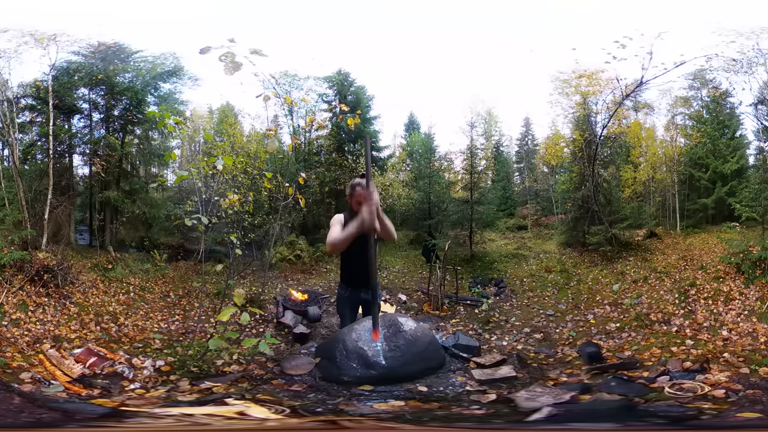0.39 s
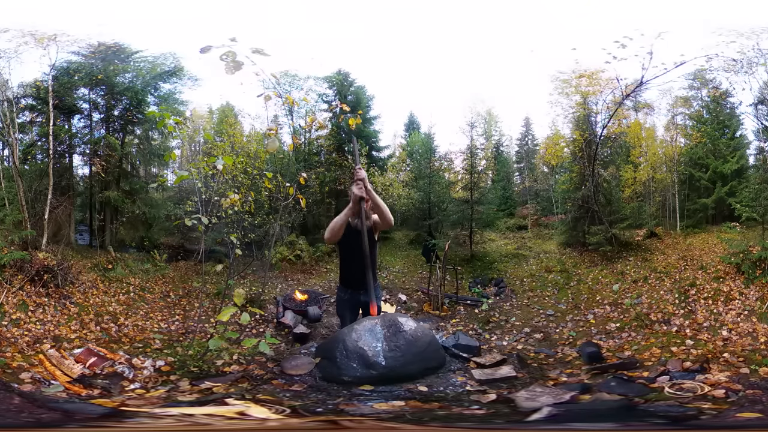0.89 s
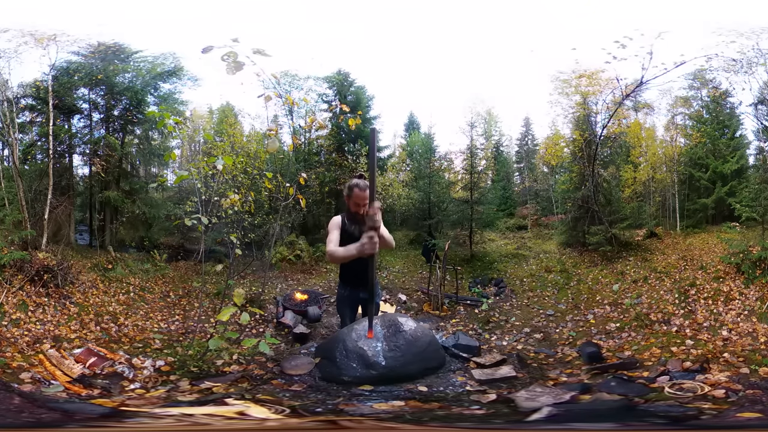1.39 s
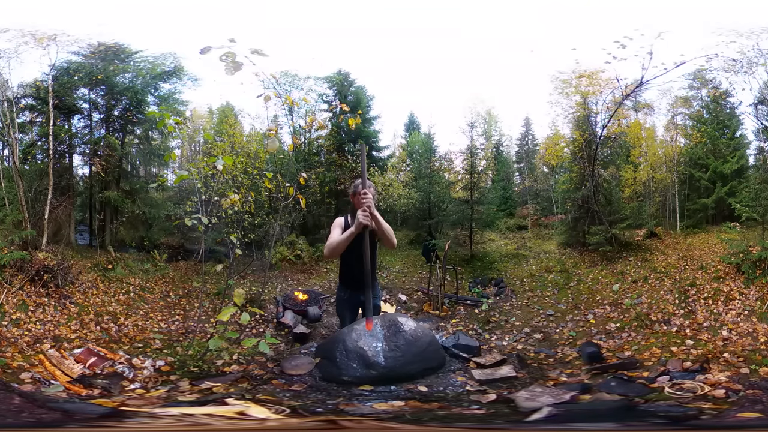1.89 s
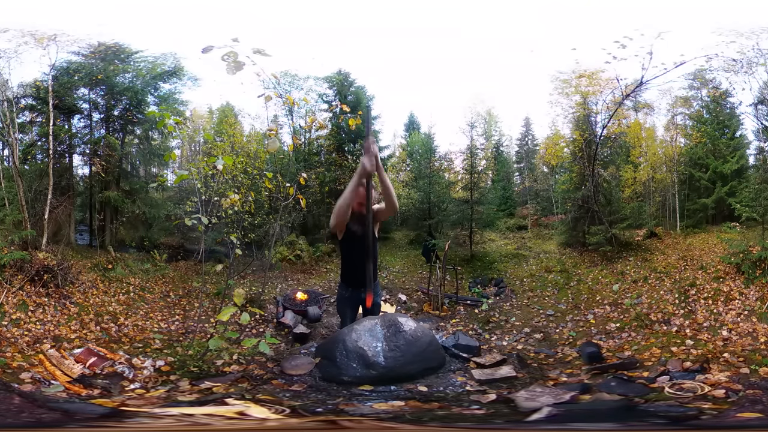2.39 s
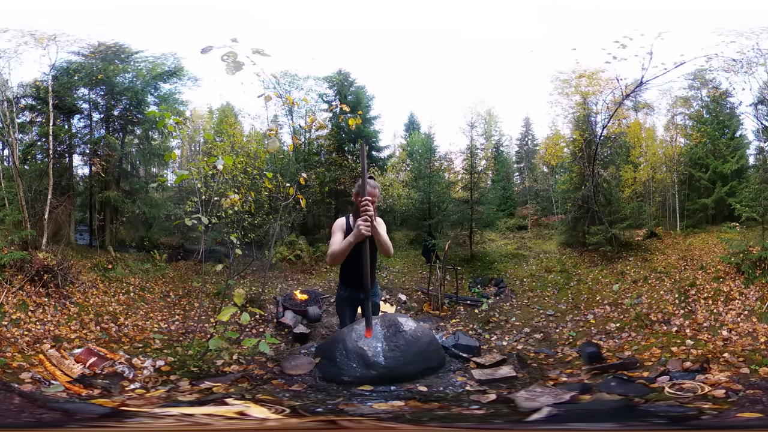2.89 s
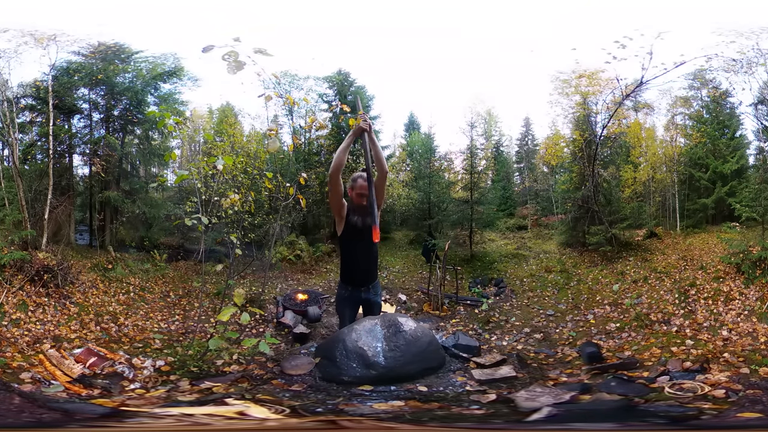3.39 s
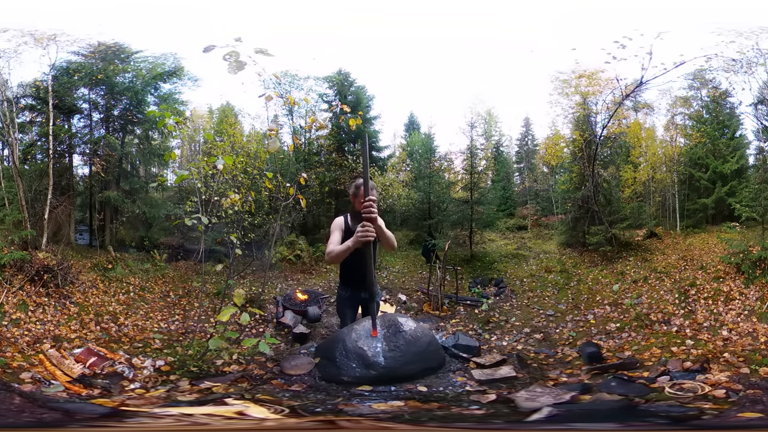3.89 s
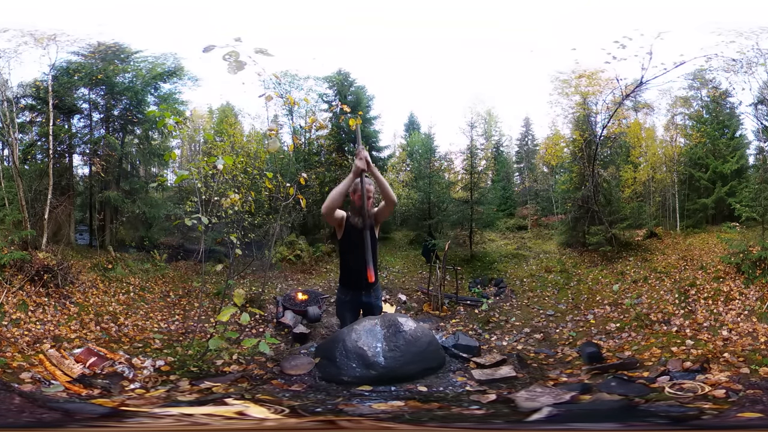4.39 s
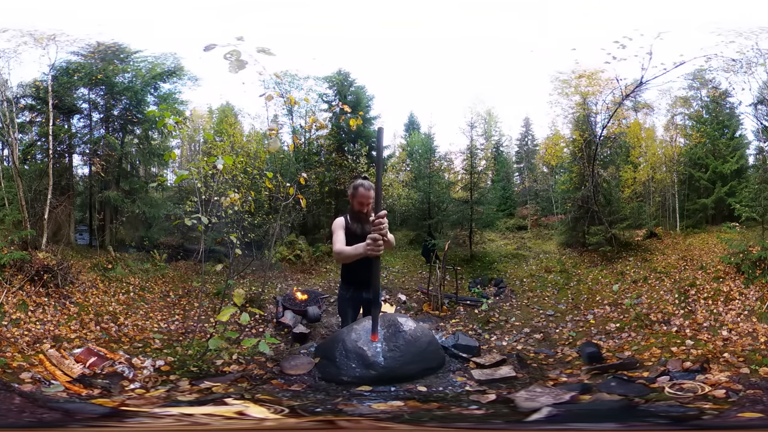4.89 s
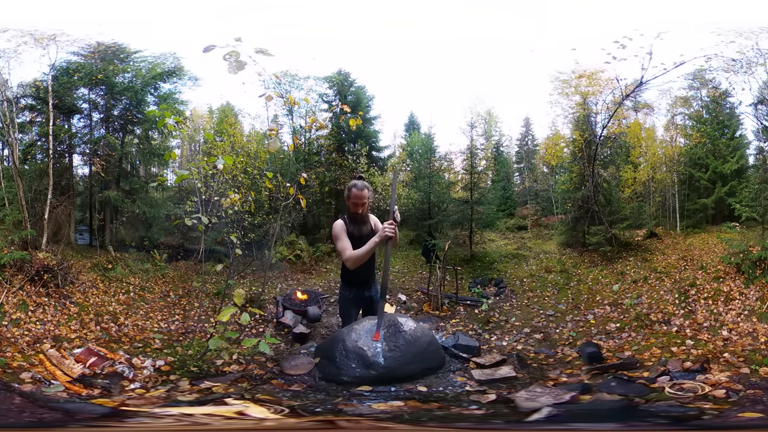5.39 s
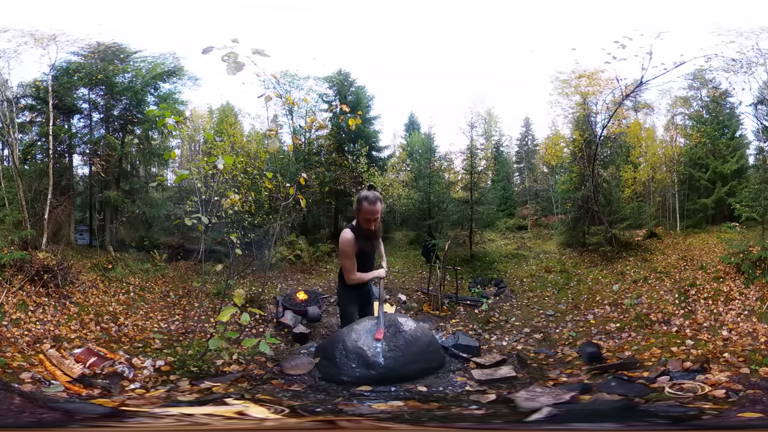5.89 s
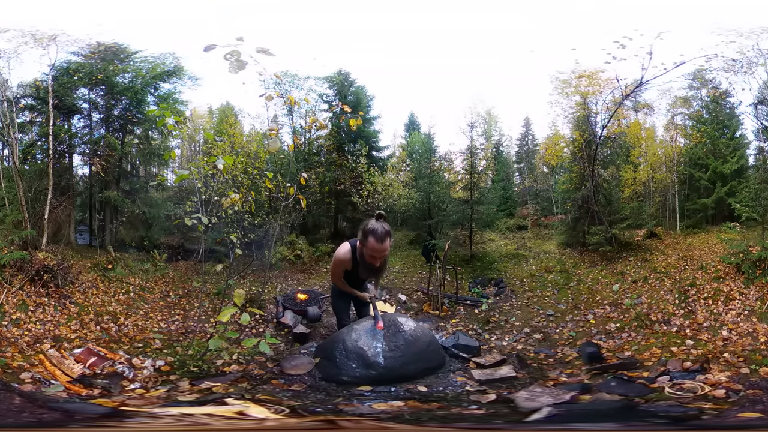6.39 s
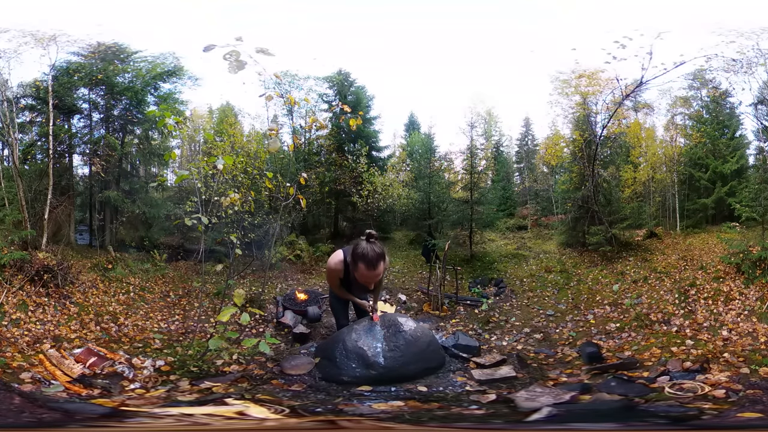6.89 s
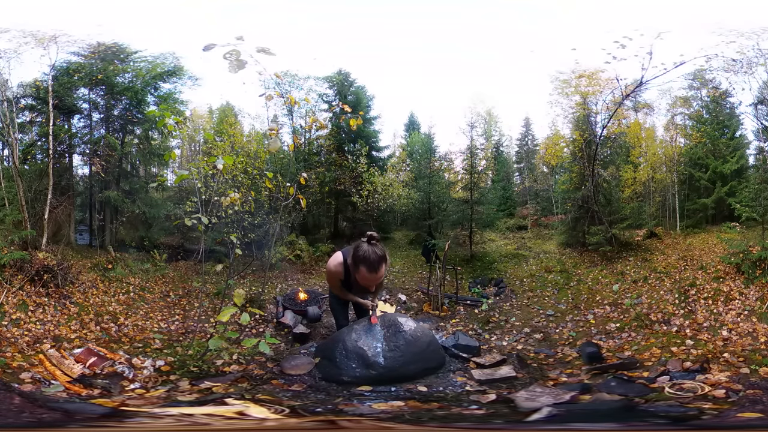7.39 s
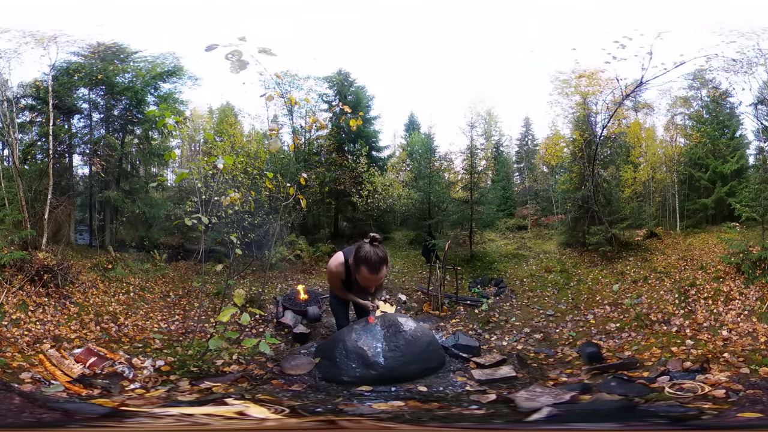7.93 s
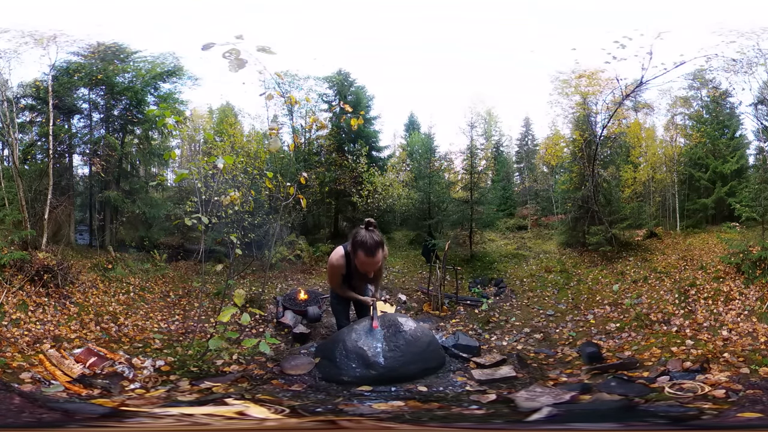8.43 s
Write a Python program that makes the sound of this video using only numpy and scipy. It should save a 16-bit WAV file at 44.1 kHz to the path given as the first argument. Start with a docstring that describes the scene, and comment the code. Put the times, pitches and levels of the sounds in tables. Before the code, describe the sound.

A mono outdoor take in a calm forest clearing, with faint steady wind in distant leaves. It opens with a thin residual metallic ring from the raised bar, a soft hand slide and a tiny high bird note. At about 0.45 seconds a steel bar lands end-first on a boulder: a loud, sharp crack, quick rebounds, a bright ring and a gritty spray of scale. Similar blows follow near 1.4, 2.5, 3.65 and 4.85 seconds, the later ones chattering longer and jangling in changing pitches before the hands choke them. Each has a soft low ground thump and a short diffuse answer from the trees. Grainy hisses of palms sliding on steel and small ticks fill the gaps. Brief bird notes appear around 4.6 to 4.85. A last faint slide ends near 5.4, tiny low knocks come at 6, then only quiet leaf rustle until about 8.6.

```python
"""A flat steel bar, its end hot, is lifted with both hands and dropped end-first on a boulder in a forest clearing.
Each blow cracks as a falling chirp; the tip rebounds and chatters, and the bar rings in bending and lengthwise modes.
Hot scale sprays as gritty noise, the ground booms softly and the trunks answer with decaying noise.
Behind it: shaped noise for wind in far leaves and for hands sliding on steel, a small bird in wavering sines,
and ticks as short damped rings. One microphone, mono."""
import sys
import numpy as np
from scipy import signal
from scipy.fft import rfft, irfft, next_fast_len
from scipy.io import wavfile
from scipy.ndimage import uniform_filter1d, map_coordinates

SR = 44100
rng = np.random.default_rng(int(sys.argv[2]) if len(sys.argv) > 2 else 0)


def elevation(decibels):
    """Turn decibel levels (scalar or array-like) into linear amplitude ratios."""
    levels = np.asarray(decibels, float)
    return 10 ** (levels / 20)


def unload_wav(signal):
    """Save mono or channel-first audio to the path in sys.argv[1] as 16-bit WAV at rate SR, clipped to [-1, 1]."""
    wavfile.write(
        sys.argv[1],
        SR,
        np.round(np.clip(np.atleast_2d(signal).T, -1, 1) * 32767).astype(np.int16),
    )


N = 376613  # length in samples

# bending modes of the bar, a pair for its two planes:
# flatwise f/Hz, edgewise f/Hz, relative level in a blow/dB, relative level in a rebound/dB
BAR_MODES = [(650.4, 681, -5, -18.5), (1050, 1104, -7, -11), (1536, 1650, -4.5, -3.5),
             (2121, 2262, -2, 0.5), (2760, 2972, -3, -7.5), (3550, 3766, -5.5, -2.5),
             (4445, 4609, -15, -7.5), (5235, 5543, -10.5, -7.5), (6160, 6535, -20, -16),
             (7280, 7590, -14, -17), (8240, 8680, -24, -27)]
# contacts of tip and stone, each blow then its chatter:
# t/s, crack peak level/dB, bending level/dB, favoured mode f/Hz, lengthwise level/dB
CONTACTS = [ (.4510, -4.5, -34, 2760, -29.5), (.483, -26, -34.5, 2970, -33),
            (.503, -31, -42.5, 1650, -36.5), (1.4184, -5, -30, 1650, -32), (1.4431, -26, -34.5, 2970, -55),
            (1.456, -41, -42.5, 5545, -61), (1.485, -33, -45, 1650, -37.5), (2.497, -4.5, -29.5, 2118, -36),
            (2.5298, -19, -32.5, 3550, -46), (2.562, -57, -39.5, 3550, -28), (2.585, -46, -40, 5235, -28.5),
            (2.598, -39, -42.5, 2970, -32), (3.6600, -4.5, -29.5, 1650, -51), (3.686, -45, -35, 1105, -48),
            (3.6981, -19, -32.5, 3765, -40), (3.707, -32, -31.5, 3765, -44), (3.72, -40, -36, 5545, -32),
            (3.756, -38, -39, 5235, -57), (3.782, -48, -49, 1650, -40), (4.8629, -3.5, -31, 2265, -42),
            (4.9, -21, -32.5, 2265, -44), (4.913, -26, -31.5, 2970, -37), (4.941, -54, -38, 5545, -40),
            (4.953, -39, -35.5, 2970, -52), (4.969, -48, -39, 3766, -37), (5.005, -38, -46, 2265, -39)]
# each blow in turn: hands close t/s, lengthwise fade until then/(dB/s), crack brightness/(dB per octave),
# level of the plane not struck/dB, scale spray level/dB
GRIPS = [(.57, 41, 3, -2, -19), (1.741, 95, 6.5, -7, -37), (2.76, 126, 4.5, -14, -55),
         (4.04, 51, 4.5, -15, -57), (5.19, 120, 10, 0, -47)]
BLOW_DB = -15  # a contact whose crack is stronger is a blow


def unit(x):
    """Scaled to rms 1."""
    return x / np.sqrt(np.mean(x ** 2) + 1e-20)


def along(f, v, hz):
    """Points joined on a log frequency axis."""
    return np.interp(np.log(hz + 1), np.log(np.asarray(f) + 1), v)


def curve(rows):
    """One value per sample for each column after the time."""
    s, *cols = np.transpose(rows)
    return [np.interp(np.arange(N) / SR, s, c) for c in cols]


def wobble(rate):
    """A smooth random curve, rate knots a second."""
    knots = rng.standard_normal(int(N * rate / SR) + 4)
    return map_coordinates(knots, [np.arange(N) * rate / SR])


def coloured(x, spectrum):
    """x with the (f/Hz, level/dB) spectrum laid on it."""
    m = next_fast_len(N + 8192)
    gain = elevation(along(*np.transpose(spectrum), np.fft.rfftfreq(m, 1 / SR)))
    return irfft(rfft(x, m) * gain, m)[:N]


def rush(spectrum, patchy_db):
    """Coloured noise of rms 1 with patches of random gain."""
    z = signal.stft(rng.standard_normal(N), nperseg=512)[2]
    field = uniform_filter1d(rng.standard_normal(z.shape), 6, 0)  # smooth across frequency
    field = uniform_filter1d(field, 10, 1)  # and time
    patchy = signal.istft(z * elevation(patchy_db * unit(field)), nperseg=512)[1]
    return unit(coloured(patchy, spectrum))


def tone(rows, hz, db, waver_hz):
    """A slightly unsteady sine that lasts as long as its table."""
    t = np.arange(N) / SR
    fade = np.clip(np.minimum(t - rows[0][0] + 0.0056, rows[-1][0] - t) / 0.0046, 0, 1)
    phase = 2 * np.pi * np.cumsum(hz + waver_hz * wobble(120)) / SR
    return np.sqrt(2) * fade * elevation(db) * np.sin(phase)


def emphasis(hz, loud_hz, loud_db, octaves):
    """Where and how the tip lands favours some modes: a bump in dB around loud_hz."""
    return loud_db * np.exp(-(np.log2(hz / loud_hz) / octaves) ** 2)


def wind():
    """Leaves far off: steady coloured noise with slow and quick swells."""
    # colour of the leaves: f/Hz, relative level/dB per Hz
    leaf_colour = [(35, -65), (60, -27.5), (121, -29.5), (266, -15.5), (404, -6.5), (615, -4), (913, -1),
                   (2850, -4.5), (10800, -19.5), (15600, -17)]
    level_db = -55 + 0.18 * wobble(2.18) + 0.38 * wobble(15)
    return elevation(level_db) * rush(leaf_colour, patchy_db=1.02)


def bird():
    """Thin high notes with a fast tremble in level and a waver in pitch."""
    # one list per note: t/s, f/Hz, level before the tremble/dB
    notes = [
        [(0.001, 8350, -69), (0.048, 7700, -61), (0.14, 8330, -62.5), (0.21, 8250, -72)],
        [(4.59, 7600, -74), (4.62, 7900, -68), (4.67, 8360, -76)],
        [(4.725, 7600, -66), (4.818, 8050, -60), (4.855, 7840, -75)],
    ]
    tremble = elevation(3.1 * wobble(200))
    return tremble * sum(tone(rows, *curve(rows), waver_hz=160) for rows in notes)


def ticks():
    """Short damped rings, their pitch scattered from cycle to cycle."""
    # small ticks and knocks: t/s, level before the bass cut/dB, f/Hz, t60/s
    small_knocks = [(.786, -51, 1380, 0.035), (1.129, -42, 2050, 0.026), (1.474, -43, 15550, .05),
                    (1.644, -45, 15550, .06), (1.809, -46, 10900, 0.006), (2.606, -49, 15550, .05),
                    (2.835, -49, 7000, 0.0035), (3.648, -46, 914, 0.058), (5.992, -54.5, 395, 0.092),
                    (5.991, -61, 672, 0.17), (6.085, -60, 581, 0.29)]
    out, t = np.zeros(N + SR), np.arange(SR // 8) / SR
    for s, db, hz, t60 in small_knocks:
        scatter = unit(uniform_filter1d(rng.standard_normal(len(t)), round(SR / hz)))
        scatter_hz = np.clip(0.081 * hz, 130, 400)
        ring = np.sin(2 * np.pi * np.cumsum(hz + scatter_hz * scatter) / SR)
        attack = 1 - np.exp(-t / 0.00012)
        out[round(s * SR):][:len(t)] += elevation(db - 60 * t / t60) * attack * ring
    return coloured(out, [(60, -6), (250, 6.5)])  # too small to push out bass


def hands():
    """Hands along the bar: a bright, slightly grainy hiss that swells along each slide and stops short."""
    # slides: start t/s, end t/s, level at the top of the swell/dB
    slides = [(-.05, 0.126, -55), (0.5, 0.754, -49.5), (1.475, 1.708, -55), (1.97, 2.228, -52.5),
              (3.117, 3.384, -51), (3.79, 3.976, -52), (4.365, 4.554, -52), (5.053, 5.39, -59)]
    # colour of skin on steel: f/Hz, relative level/dB per Hz
    skin_colour = [(60, -57), (300, -15), (1200, 3.5), (4000, 1), (9000, -6.5), (15500, -0.5)]
    t, stroke = np.arange(N) / SR, np.zeros(N)
    for start, end, db in slides:
        rise = (t - start) / (.5 * (end - start))
        stop = (end - t) / 0.024
        stroke += elevation(db) * np.clip(np.minimum(rise, stop), 0, 1)
    grain = elevation(1.5 * wobble(40) + 0.58 * wobble(230))
    return stroke * unit(grain * rush(skin_colour, patchy_db=-3.5))


def ground():
    """The boulder rocks in the soil: a low boom swells a moment after each blow."""
    t = np.arange(N) / SR
    swell = sum(elevation(db) * np.exp(-((t - s - .1) / 0.029) ** 2) for s, db, *_ in CONTACTS if db > BLOW_DB)
    boom = rush([(35, -36), (62, 1.0), (100, -24), (500, -52)], patchy_db=3)
    return elevation(-70.5) * swell * boom


def scale():
    """Each blow sheds brittle scale: a bright gritty spray of noise that soon dies."""
    # colour of the spray: f/Hz, relative level/dB per Hz
    spray_colour = [(3000, -37), (7000, -12), (12000, -9), (15500, 7)]
    spray_t60 = .13  # s
    t = np.arange(N) / SR
    blows = [s for s, db, *_ in CONTACTS if db > BLOW_DB]
    spray = sum((t > s) * elevation(row[4] - 60 * np.abs(t - s) / spray_t60) for s, row in zip(blows, GRIPS))
    return spray * unit(elevation(6.8 * wobble(400)) * rush(spray_colour, patchy_db=-5.0))


def clearing(x):
    """The trunks answer with noise, each frequency dying at its own speed; new noise every 9/8 s."""
    # the trunks: f/Hz, relative level/dB, t60/s
    trunks = [(60, -15, 0.72), (152, 7.5, 0.11), (497, -24, 1), (2000, -19, 0.7), (5970, -19, 1),
              (15000, -9, 0.24)]
    out, (f, db, t60) = np.zeros(N + 2 * SR), np.transpose(trunks)
    span = 9 * SR // 8
    for start in range(SR // 5, N, span):
        hz, t, z = signal.stft(rng.standard_normal(SR // 2), SR, nperseg=512)
        decay_db = along(f, db, hz)[:, None] - 60 * t / along(f, t60, hz)[:, None]
        build = 1 - np.exp(-t / 0.019)
        tail = signal.istft(z * build * elevation(decay_db), SR, nperseg=512)[1]
        wet = signal.fftconvolve(x[start:][:span], tail / 40)
        out[start + 200:][:len(wet)] += wet  # 200 samples of travel
    return out[:N]


def rattle():
    """Between clear contacts the tip jitters on rough stone: dense tiny knocks stir every mode into a jangle."""
    knocks_per_s, rattle_t60, width_hz = 2500, .35, 70  # width of the modes stirred
    rattle_db, airborne_db = -2, -5  # against the contact's ring; less still while the bar is thrown clear
    askew = .35  # dB of rattle per dB in the plane not struck
    t, m = np.arange(N) / SR, next_fast_len(N + 8192)
    s, crack_db, ring_db, *_ = np.transpose(CONTACTS)
    blow = crack_db > BLOW_DB
    ring_db = ring_db + airborne_db * blow + askew * np.array(GRIPS)[np.cumsum(blow) - 1, 3]
    last = np.maximum(np.searchsorted(s, t) - 1, 0)  # latest contact
    knocks = unit((rng.random(N) < knocks_per_s / SR) * rng.standard_normal(N))
    f, (flat, edge, _, db) = np.fft.rfftfreq(m, 1 / SR), np.transpose(BAR_MODES)
    modes = 0
    for k, (centre, mode_db) in enumerate(zip(np.r_[flat, edge], np.r_[db, db])):
        resonance = 1j * f * width_hz / (centre * centre - f * f + 1j * f * width_hz)
        modes = modes + (-1) ** k * elevation(mode_db) * resonance
    drive = (t > s[0]) * elevation(ring_db[last] + rattle_db - 60 * np.abs(t - s[last]) / rattle_t60)
    size = np.sqrt(np.mean(np.abs(modes) ** 2))
    return irfft(rfft(drive * knocks, m) * modes / size, m)[:N]


def lengthwise():
    """The clearest ring: contacts reset it, the grip fades and stops it, its pitch climbs as the bar comes free."""
    # swells and sinks while the bar is first raised: start t/s, end t/s, level at the top/dB
    raising = [(-.01, 0.052, -42), (0.048, 0.125, -41), (0.09, 0.318, -49), (0.31, 0.478, -56.5)]
    raised_hz, pressed_hz, free_hz = 2520, 2535, 2543  # first raised, on the stone, off the stone
    release_s, build_s, close_db_per_s = 0.0623, 0.0087, 502  # pitch release, build-up, choke by the hands
    t = np.arange(N) / SR
    s, crack_db, _, _, db = np.transpose(CONTACTS)
    last = np.maximum(np.searchsorted(s, t) - 1, 0)  # latest contact
    blows = s[crack_db > BLOW_DB]
    blow = np.maximum(np.searchsorted(blows, t) - 1, 0)  # latest blow
    close, fade = np.array(GRIPS)[blow, :2].T
    goal_db = db[last] - fade * (t - s[last]) - close_db_per_s * np.maximum(t - close, 0)
    goal = (t > s[0]) * elevation(goal_db)
    keep = np.exp(-1 / (build_s * SR))
    size = signal.lfilter([1 - keep], [1, -keep], goal)
    size += sum(elevation(top) * np.sin(np.pi * np.clip((t - start) / (end - start), 0, 1))
                for start, end, top in raising)
    bar_hz = free_hz + (pressed_hz - free_hz) * np.exp(-np.abs(t - blows[blow]) / release_s)
    hz = np.where(t > s[0], bar_hz, raised_hz)
    return np.sqrt(2) * size * np.sin(2 * np.pi * np.cumsum(hz + 7.7 * wobble(120)) / SR)


def bending():
    """Every contact shares the energy anew among the modes; they decay, then are choked by the next contact."""
    airborne_t60, pressed_t60, treble_loss = .55, .28, .25  # s at 2500 Hz, after a blow and a rebound; power of Hz
    choke_db_per_s, graze_db_per_s = 807, 256  # at the next contact, at a mere graze
    graze_db = -39.5  # a contact whose crack is weaker only grazes the stone
    blow_favour_db, favour_db, carry_db = 7.5, 8.5, 7  # favoured mode in a blow, in a rebound; the blow's, carried on
    rebound_plane_db = -7  # plane not struck, in a rebound
    skirt_db_per_octave = 1.5  # in a rebound, modes far from the favoured one get less
    luck_db = 2  # scatter of each mode's level
    chatter_db, chatter_per_s = 2.5, 120  # each mode flutters while the tip rattles on the stone
    out, times = np.zeros(N), np.array(CONTACTS)[:, 0]
    flat, edge, blow_db, rebound_db = np.transpose(BAR_MODES)
    hz = np.concatenate([flat, edge])[:, None]
    edgewise = np.repeat([False, True], len(BAR_MODES))[:, None]
    landings = (row[3] for row in GRIPS)
    for k, (s, _, ring_db, loud_hz, _) in enumerate(CONTACTS):
        first = k == 0 or s - times[k - 1] > .3  # a blow
        more = k + 1 < len(times)
        left = min(times[k + 1] - s if more else 1, .45)  # choked after 0.45 s at the latest
        t = np.arange(round((left + .08) * SR)) / SR
        choke = graze_db_per_s if more and CONTACTS[k + 1][1] < graze_db else choke_db_per_s
        luck = rng.standard_normal((3, len(hz), 1))  # level, pitch, phase
        other_db = next(landings) if first else rebound_plane_db
        struck = edgewise[np.argmin(np.abs(hz - loud_hz))]
        db = ring_db + np.tile(blow_db if first else rebound_db, 2)[:, None]
        db = db + other_db * (edgewise != struck) + luck_db * luck[0]
        db += emphasis(hz, loud_hz, blow_favour_db if first else favour_db, 0.033)
        if first:
            blow_hz = loud_hz
        else:
            db -= skirt_db_per_octave * np.abs(np.log2(hz / loud_hz))
            db += emphasis(hz, blow_hz, carry_db, 0.026) - emphasis(loud_hz, blow_hz, carry_db, 0.026)
            knots = rng.standard_normal((len(hz), 90))
            places = np.broadcast_arrays(np.arange(len(hz))[:, None], t * chatter_per_s)
            db = db + chatter_db * map_coordinates(knots, places, order=1)
        fade = (1 - np.exp(-t / 0.00042)) * elevation(-choke * np.maximum(t - left, 0))
        phase = 2 * np.pi * hz * (1 + 0.003 * luck[1]) * t + 9 * luck[2]
        t60 = airborne_t60 if first else pressed_t60
        ring = elevation(db - 60 * t / t60 * (hz / 2500) ** treble_loss) * np.sin(phase)
        out[round(s * SR):][:len(t)] += fade * ring.sum(0)
    return out


def cracks():
    """Bending waves run faster at high pitch, so each crack is a short falling chirp."""
    # colour of a crack: f/Hz, relative level/dB
    crack_colour = [(59, -50), (100, -14.5), (518, 4.5), (1120, -4.5), (1910, -1), (3470, 0.5),
                    (12500, -28), (16500, -42)]
    favour_db = 3  # the crack leans toward the favoured mode
    soft_db_per_db = .4  # brightness a rebound loses for each dB it is weaker
    bounce_s, bounce_db = .0016, -10  # the crack once more off the ground
    out, hz = np.zeros(N + 1024), np.fft.rfftfreq(1024, 1 / SR)
    causal = np.r_[1, np.full(511, 2), 1, np.zeros(511)]  # folds the cepstrum to minimum phase
    blows = (row[2] for row in GRIPS)
    for s, db, _, loud_hz, _ in CONTACTS:
        ripple = uniform_filter1d(rng.standard_normal(len(hz)), 10)
        colour = along(*np.transpose(crack_colour), hz) + 9 * ripple
        colour += emphasis(hz + 50, loud_hz, favour_db, 0.48)
        bright_db = next(blows) if db > BLOW_DB else soft_db_per_db * (db + 13)
        colour += bright_db * np.log2(1 + hz / 4000)  # weaker contacts are softer, so duller
        lag = 4 * np.pi * 0.03046 * np.sqrt(hz) - 2 * np.pi * hz * (.0001 - 64 / SR)  # low pitch comes later
        bounce = 1 + elevation(bounce_db) * np.exp(-2j * np.pi * hz * bounce_s)
        minimum_phase = rfft(causal * irfft(np.log(elevation(colour))))
        pulse = irfft(bounce * np.exp(minimum_phase - 1j * lag))
        out[round(s * SR) - 64:][:1024] += elevation(db) * pulse / np.abs(pulse).max()
    return out[:N]


def scene():
    """Bar, clearing and background."""
    crack, ring = cracks(), bending() + rattle()
    bar = crack + ring + lengthwise() + clearing(crack + .5 * ring)
    return (bar + ground() + ticks() + bird() + hands() + wind() + scale())[None]


def low_pass(x):
    """Removes everything above the highest recorded frequency."""
    return signal.sosfilt(signal.butter(12, 17060, fs=SR, output="sos"), x)


def record(dry):
    """One microphone with a steep band limit just under 16 kHz."""
    mix = coloured(dry[0], [(15700, 0), (15900, -54)])[None]
    return low_pass(mix)


dry = scene()
out = record(dry)
unload_wav(out)
```